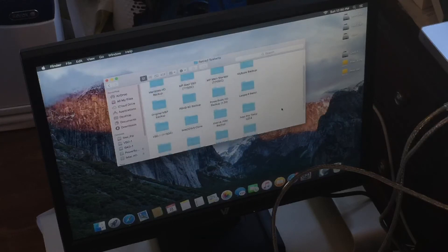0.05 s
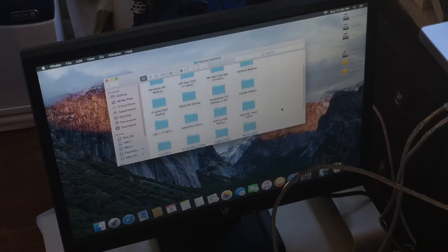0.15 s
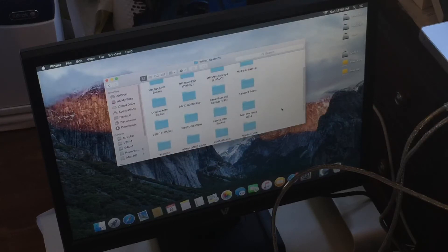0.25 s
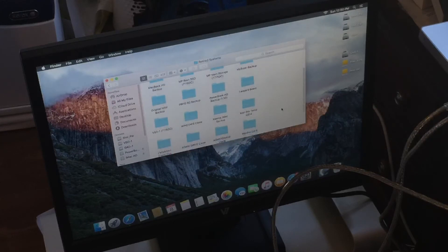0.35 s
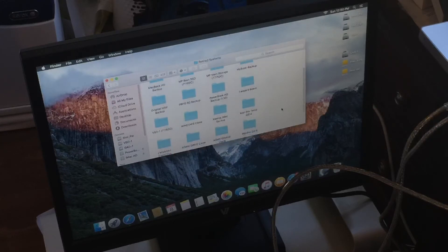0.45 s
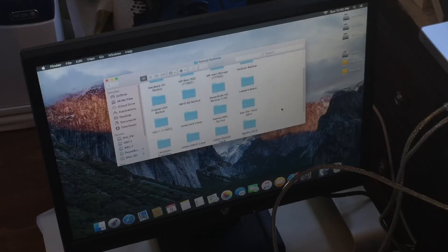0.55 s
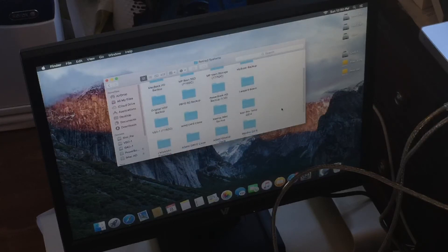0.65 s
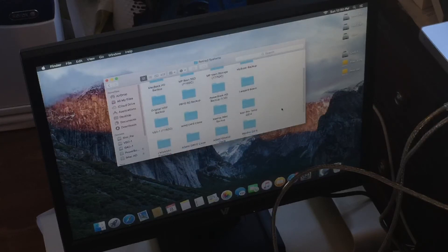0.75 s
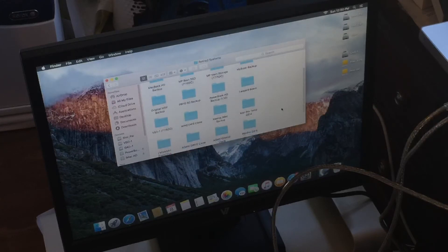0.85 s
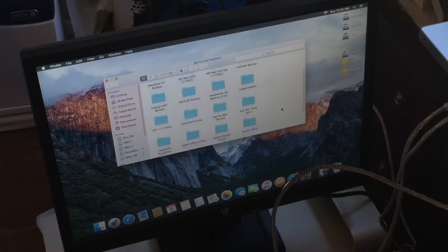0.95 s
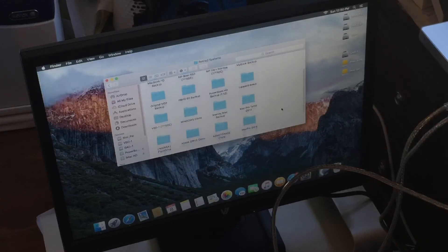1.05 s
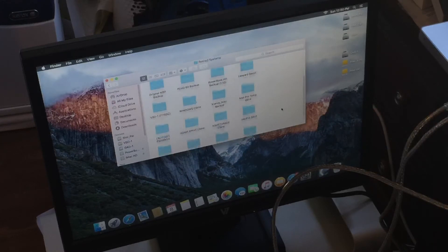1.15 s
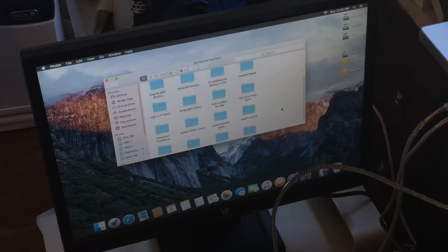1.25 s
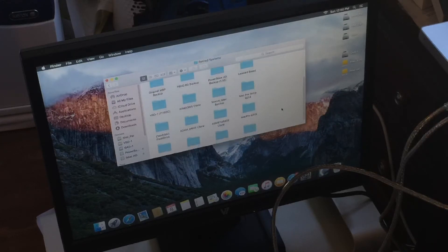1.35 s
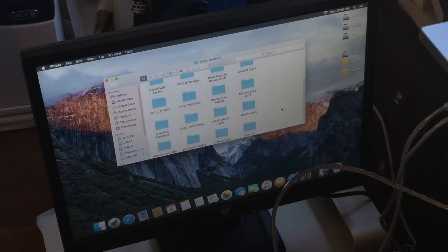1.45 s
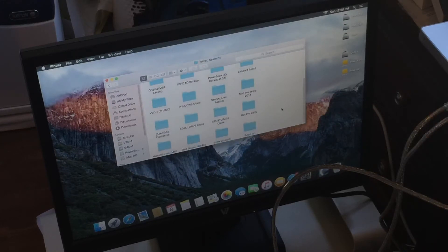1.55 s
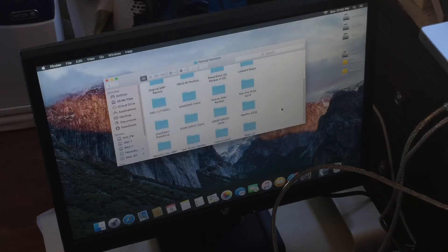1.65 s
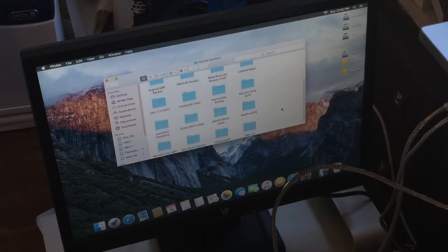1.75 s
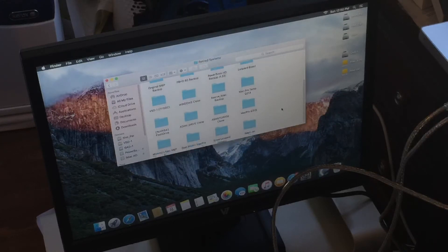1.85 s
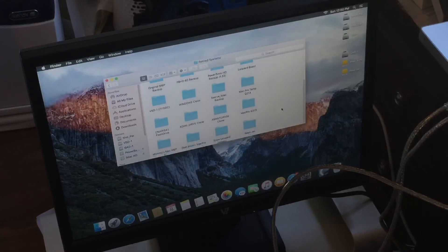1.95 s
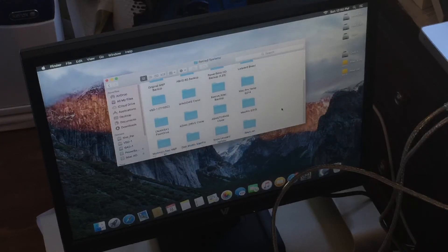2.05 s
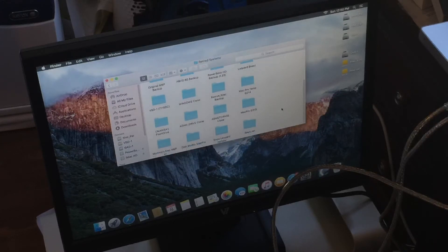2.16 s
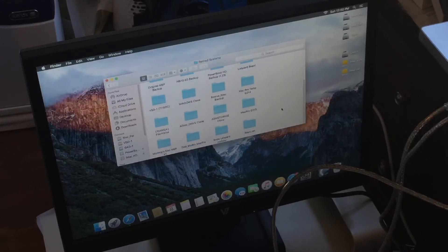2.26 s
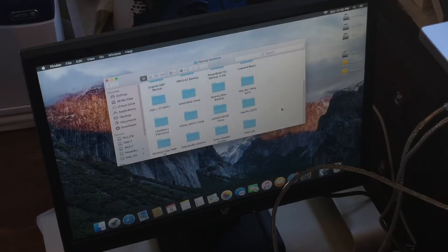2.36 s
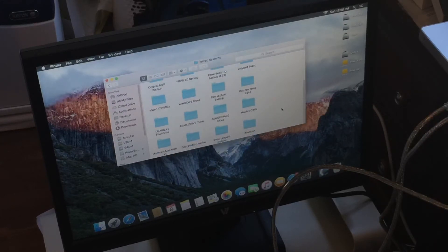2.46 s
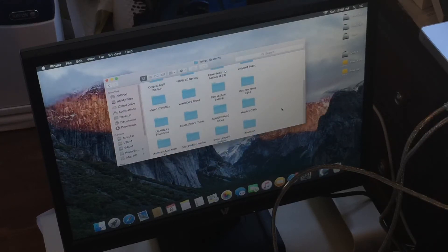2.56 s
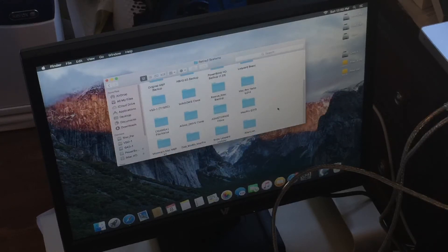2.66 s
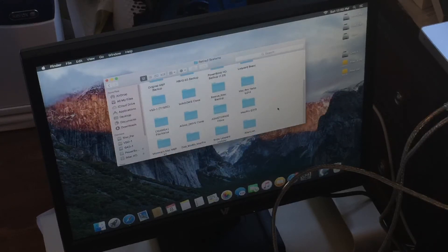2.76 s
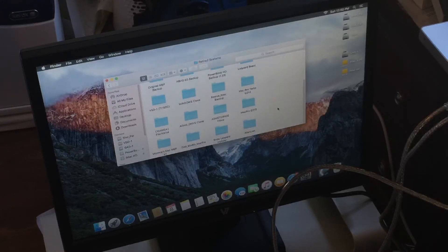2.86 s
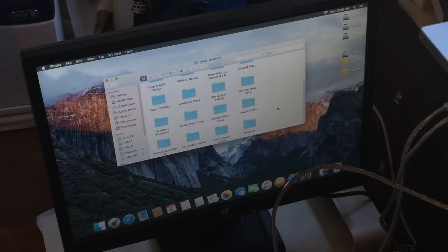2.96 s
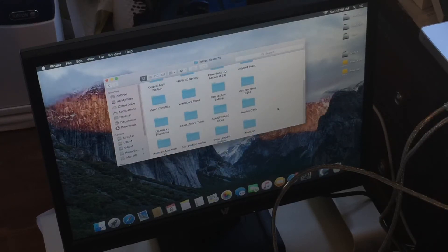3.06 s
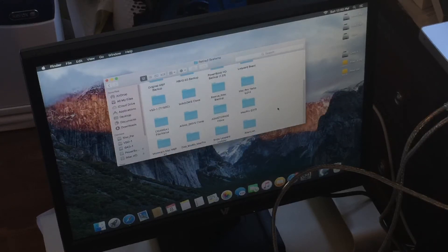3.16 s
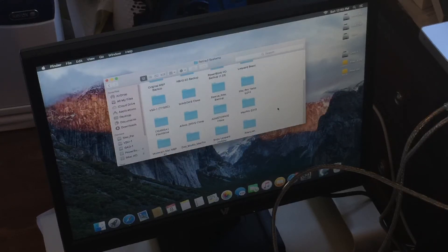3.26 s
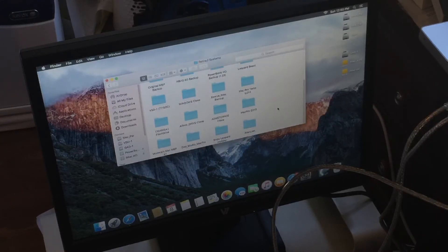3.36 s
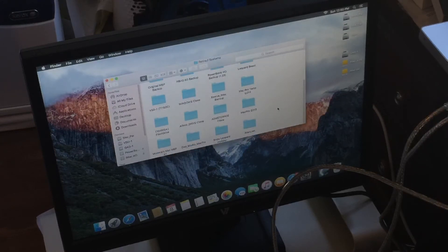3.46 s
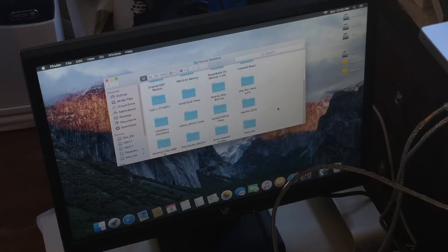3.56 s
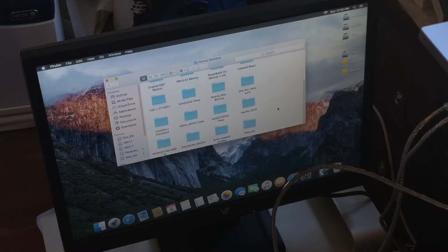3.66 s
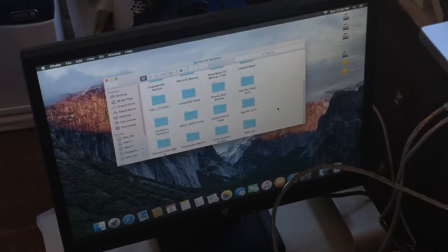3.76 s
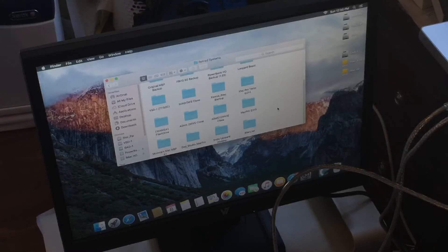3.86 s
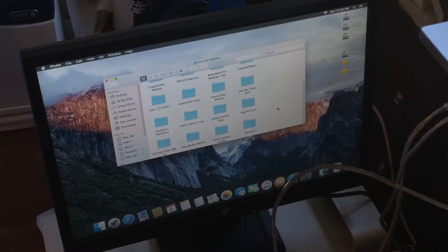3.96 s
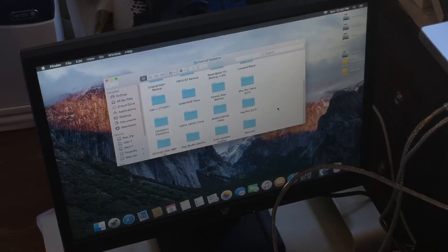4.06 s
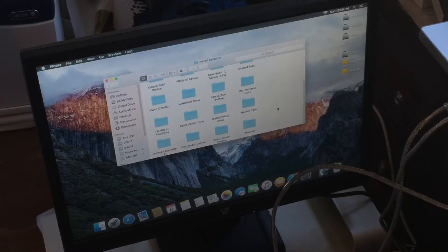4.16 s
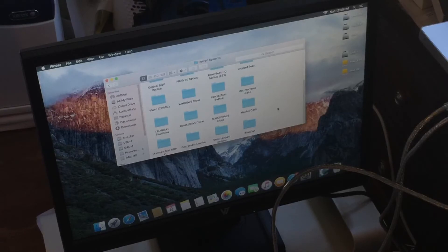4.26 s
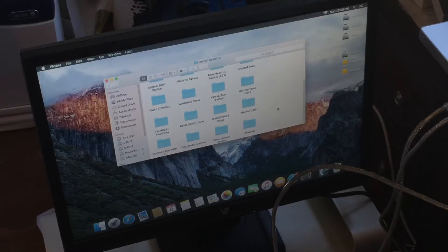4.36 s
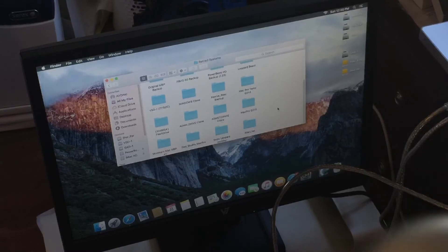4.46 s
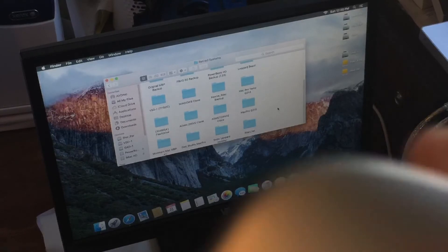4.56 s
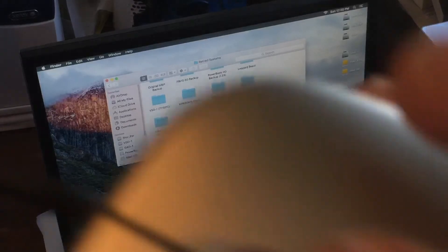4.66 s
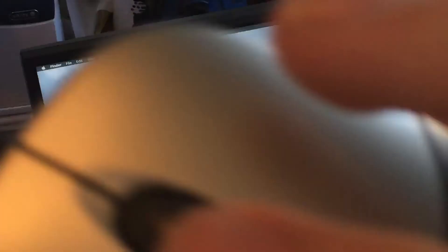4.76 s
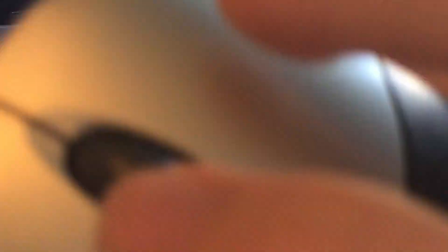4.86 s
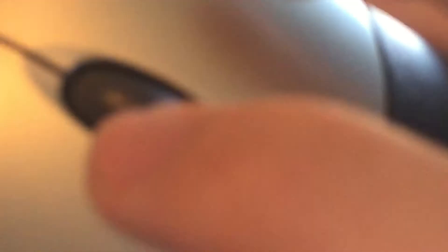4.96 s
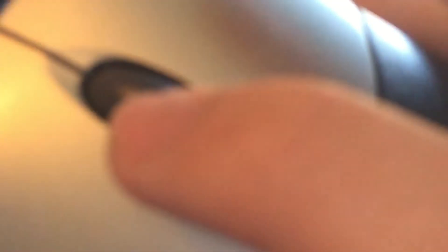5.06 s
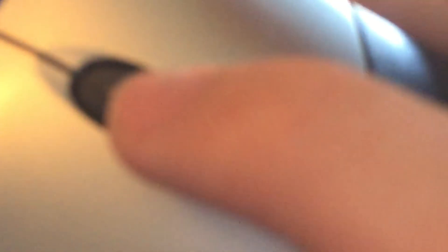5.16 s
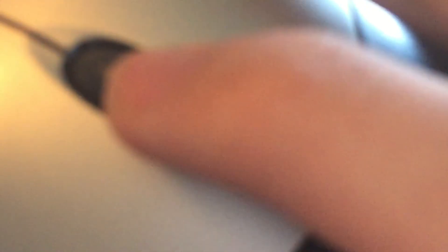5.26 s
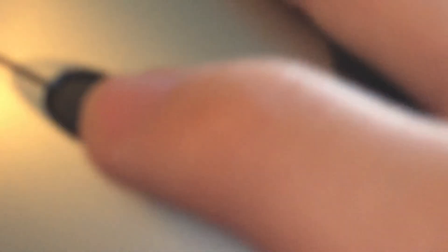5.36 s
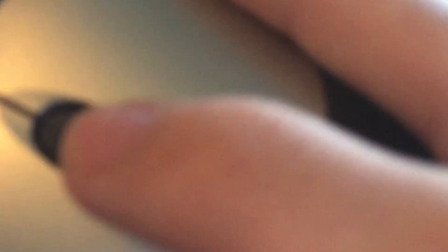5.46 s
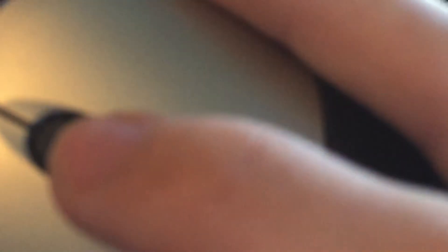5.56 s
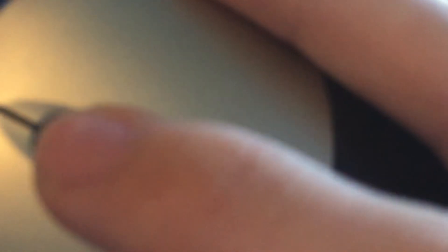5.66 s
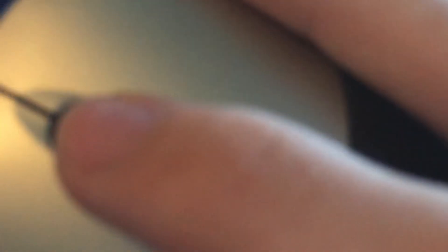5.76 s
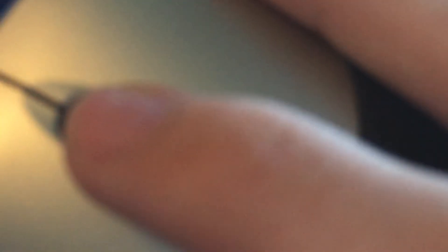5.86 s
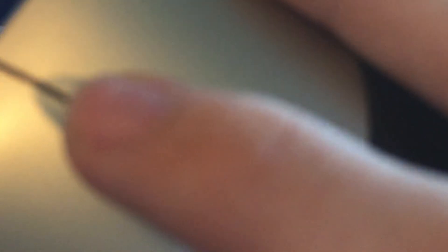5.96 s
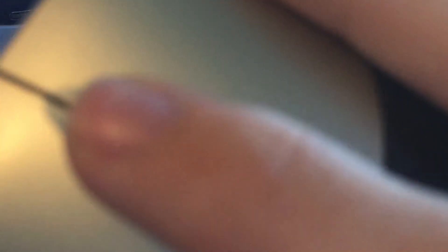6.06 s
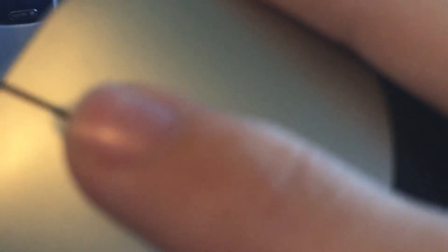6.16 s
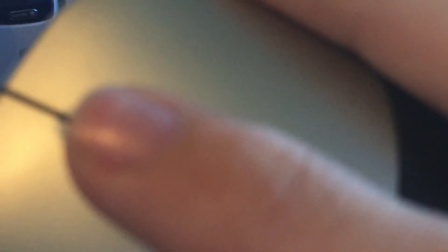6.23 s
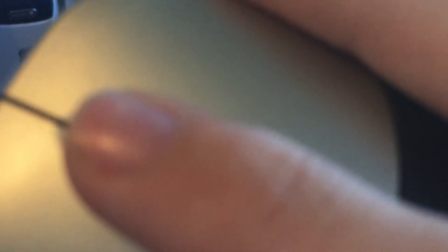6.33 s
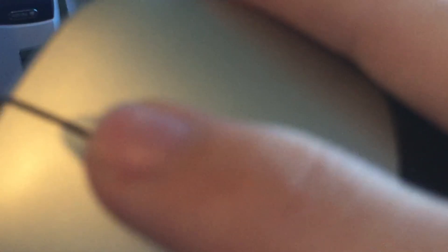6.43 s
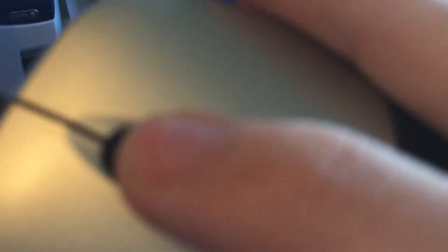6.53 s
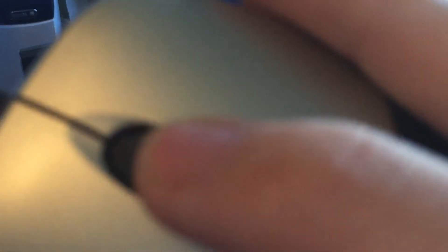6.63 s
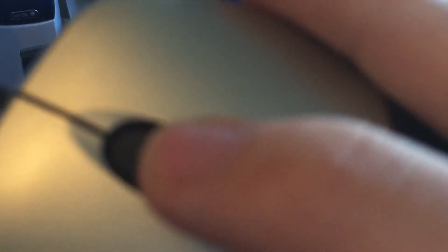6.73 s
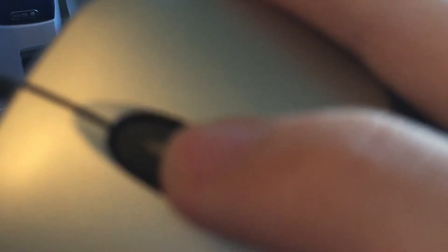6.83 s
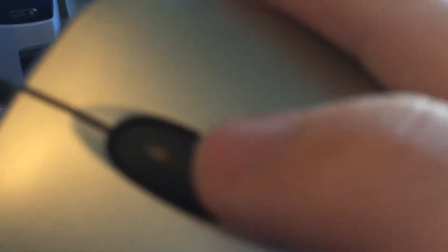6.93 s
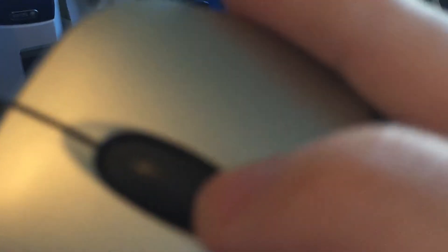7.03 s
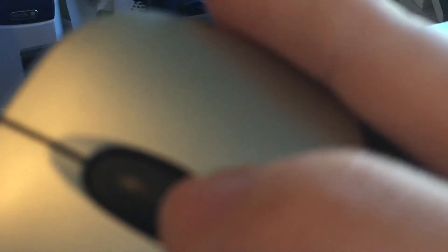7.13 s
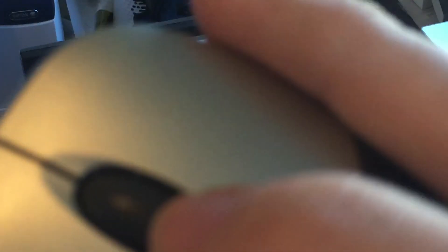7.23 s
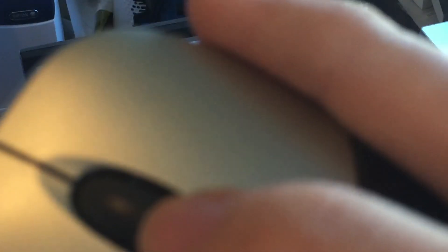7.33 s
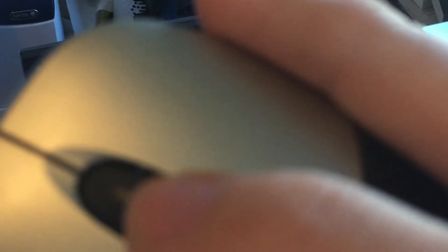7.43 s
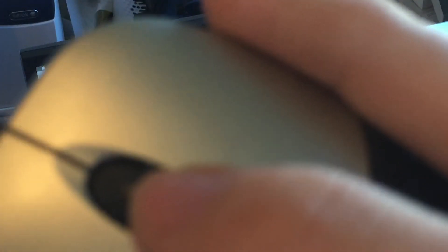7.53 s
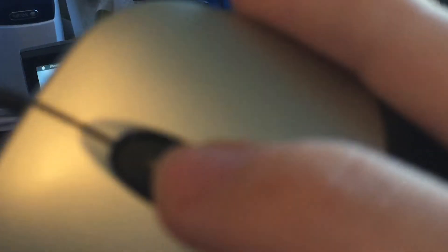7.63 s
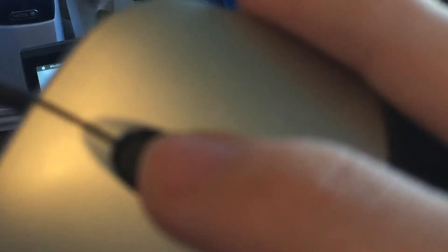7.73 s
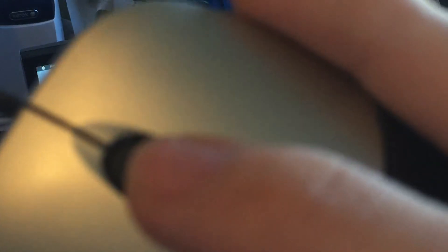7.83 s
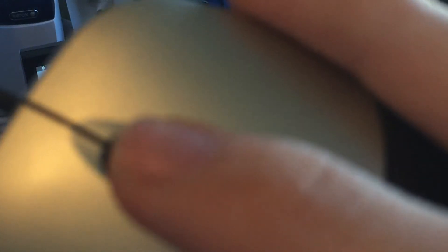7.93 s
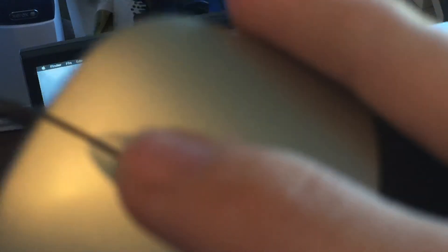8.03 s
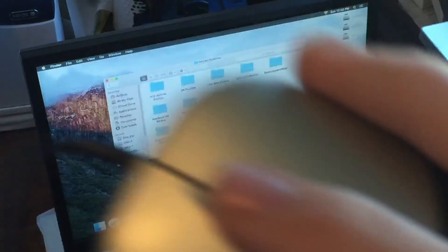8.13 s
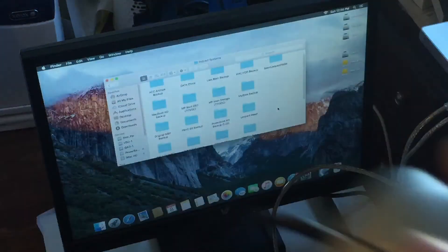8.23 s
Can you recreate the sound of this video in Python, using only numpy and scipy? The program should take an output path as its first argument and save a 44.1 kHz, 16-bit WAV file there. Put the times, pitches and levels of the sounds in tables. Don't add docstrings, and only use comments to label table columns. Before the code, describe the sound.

Small plastic ticks of a scroll wheel, first rolled forward, then back in a quick cluster, sound a little distant and coloured by the desk. Fingers tap and rustle, a dull thump shakes the microphone and a sleeve sweeps past. Held up close, the wheel snaps crisply and loudly with short squeaky creaks, over low room tone and hiss.

```python
import sys
import numpy as np
from scipy import signal
from scipy.fft import rfft, irfft, next_fast_len
from scipy.io import wavfile
from scipy.ndimage import uniform_filter1d, map_coordinates

SR = 44100
rng = np.random.default_rng(int(sys.argv[2]) if len(sys.argv) > 2 else 0)


def amplitude_ratio(level_db):
    exponent = np.asarray(level_db, float) / 20
    return 10 ** exponent


def dump_mix(stems):
    frames = np.atleast_2d(stems).T
    limited = np.clip(frames, -1, 1)
    pcm = np.round(limited * 32767).astype(np.int16)
    wavfile.write(sys.argv[1], SR, pcm)


N = 365588


def unit(x):
    return x / np.sqrt(np.mean(x ** 2) + 1e-20)


def along(points, hz):
    f, value = np.transpose(points)
    return np.interp(np.log(hz + 1), np.log(f + 1), value)


def coloured(x, gain):
    m = next_fast_len(N + 8192)
    shaped = rfft(x, m) * gain(np.fft.rfftfreq(m, 1 / SR))
    return unit(irfft(shaped, m)[:N])


def narrow(hz, width_hz):
    return coloured(rng.standard_normal(N), lambda f: 1 / (1 + (2 * (f - hz) / width_hz) ** 2))


def add(track, s, sound):
    part = track[round(s * SR):][:len(sound)]
    part += sound[:len(part)]


def small(x, hz):
    return signal.sosfilt(signal.butter(3, hz, "highpass", fs=SR, output="sos"), x)


def swells(s, rise_s, fall_s, db):
    power, t = np.zeros(N), np.arange(-SR // 2, SR) / SR
    for at, rise, fall, top_db in zip(*np.broadcast_arrays(s, rise_s, fall_s, db)):
        below_db = 25 * np.maximum(-t / abs(rise), t / abs(fall))
        add(power, at + t[0], amplitude_ratio(2 * (top_db - below_db)))
    return np.sqrt(power)


def room(send, colour, wet_db, gap_s):
    # f/Hz, t60/s
    wall_decay = [(500, 0.11), (2500, 0.26), (4400, 0.23), (9000, 0.19), (15000, 0.048)]
    hz, t, z = signal.stft(rng.standard_normal(SR // 2), SR, nperseg=128)
    fading = amplitude_ratio(-60 * t / along(wall_decay, hz)[:, None])
    tail = signal.istft(z * fading, SR, nperseg=128)[1]
    onset = np.clip((np.arange(len(tail)) / SR - gap_s) / 0.00052, .15, 1)
    tail = tail / np.linalg.norm(tail) * onset
    m = next_fast_len(N + SR)
    tint = amplitude_ratio(along(colour, np.fft.rfftfreq(m, 1 / SR)))
    wet = irfft(rfft(send, m) * rfft(tail, m) * tint, m)
    return amplitude_ratio(wet_db) * wet[:N]


def air():
    # f/Hz, level/dB per Hz
    room_tone = [(12, -53), (20, -25), (65, -3), (124, -7), (223, -8), (280, -9), (403, -12.5),
                 (667, -13.5), (988, -16.5), (2230, -19), (2430, -18), (2870, -19), (12700, -27.5),
                 (15000, -29), (16400, -68.5)]
    # f/Hz, width/Hz, rms level/dB
    fan_lines = [(113, 12, -84.5), (280.6, 6.7, -80.5), (201, 17, -86), (733, 14, -88.5)]
    hiss = amplitude_ratio(-63) * coloured(rng.standard_normal(N), lambda f: amplitude_ratio(along(room_tone, f)))
    mains_phase = 2 * np.pi * 119.6 * np.arange(N) / SR + .5 * narrow(0.46, 1.8)
    mains = amplitude_ratio(-70) * np.sin(mains_phase)
    fan = sum(amplitude_ratio(db) * narrow(hz, width) for hz, width, db in fan_lines)
    return hiss + mains + fan


def squeaks():
    # start t/s, length/s, peak rms level/dB, start f/Hz
    loadings = [(0.138, 0.022, -64, 1036), (0.297, 0.022, -57, 976), (1.039, 0.028, -60, 1027),
                (1.265, 0.016, -62, 970), (1.392, 0.025, -57, 983), (1.826, 0.031, -58.5, 940),
                (1.978, 0.034, -55.5, 960), (5.675, 0.036, -46, 840), (6.019, .016, -39.5, 892),
                (6.823, 0.028, -43, 1070), (7.719, 0.021, -54, 960), (7.92, .027, -41.5, 960),
                (8.153, .018, -42.5, 980)]
    # start t/s, length/s, peak rms level/dB, f/Hz
    creeps = [
        (0.899, .01, -63.5, 1063),
        (5.643, 0.035, -63, 851),
        (6.156, 0.012, -55, 945),
        (6.803, 0.038, -58, 1005),
        (6.857, .024, -59, 1092),
        (7.165, 0.025, -69, 745),
        (7.554, 0.011, -51, 867),
        (7.567, 0.0033, -47, 850),
        (7.577, 0.0048, -52, 884),
        (7.91, 0.027, -49.5, 943),
    ]
    overtones_db = [3.5, -10, -3.5, -4.5]
    release_hz = 1128
    creep_rise = 1.02
    slips = [(*row, release_hz, -7.5) for row in loadings]
    slips += [(*row, row[-1] * creep_rise, -5) for row in creeps]
    out = np.zeros(N)
    for start, length, db, low_hz, high_hz, rasp_db in sorted(slips):
        over_db = rasp_db - 400 * length
        u = np.linspace(0, 1, max(round(length * SR), 9))
        turn = 2 * np.pi * np.cumsum(low_hz + (high_hz - low_hz) * u) / SR
        shake = np.cumsum(rng.normal(0, 0.076, len(u)))
        flutter = rng.standard_normal((len(overtones_db), len(u)))
        lumps = amplitude_ratio(60 * uniform_filter1d(flutter, size=130, axis=1))
        over = 0
        for k, overtone_db in enumerate(overtones_db):
            over = over + amplitude_ratio(over_db + overtone_db) * lumps[k] * np.sin((k + 2) * (turn + shake))
        swell = np.abs(np.sin(np.pi * u ** 1.3)) ** .55
        add(out, start, amplitude_ratio(db + 3.5) * swell * (np.sin(turn) + over))
    return out


def notches(events, shell, echo, blur, crack_db, crack_t60, bounce_s, bounce_db, wet_db, gap_s):
    out, send, t = np.zeros(N), np.zeros(N), np.arange(SR // 10) / SR
    hz, level_db, t60 = np.transpose(shell)[:, :, None]
    band = signal.butter(2, [1700, 6500], "bandpass", fs=SR)
    landing_s = .0017
    after = t - landing_s
    swell = np.sin(np.pi / 2 * np.clip(t / landing_s, 0, 1)) ** 2
    for s, db, bright_db in events:
        tone_db = level_db + rng.normal(0, 1.8, hz.shape) + bright_db * np.log2(hz / 3500)
        phase = 2 * np.pi * hz * after + blur * rng.standard_normal(hz.shape)
        modes = amplitude_ratio(tone_db - 60 * np.abs(after) / t60) * np.sin(phase)
        click = swell * np.sum(modes, axis=0)
        add(click, bounce_s, amplitude_ratio(bounce_db + rng.normal(0, 1.0)) * click.copy())
        burst = rng.standard_normal(len(t)) * swell
        crack = amplitude_ratio(crack_db - 60 * t / crack_t60) * signal.lfilter(*band, burst)
        add(out, s + .0003, amplitude_ratio(db) * (click / np.abs(click).max() + crack))
        spit = .15 * burst * amplitude_ratio(-60 * t / .01) + (t == 0)
        add(send, s, amplitude_ratio(db) * spit / np.linalg.norm(spit))
    return small(out, 490) + room(send, echo, wet_db, gap_s)


def forward_on_desk():
    # t/s, peak level/dB, brightness/dB
    forward_rolls = [(0.167, -32, -0.5), (0.3199, -31.5, 1.5), (0.9185, -34, 0.5), (1.0665, -31.5, -1.5),
                     (1.12, -33.5, -2.5), (1.2879, -31.5, -2.5), (1.417, -32.5, -2), (1.8562, -36, -1),
                     (2.0093, -34, 1), (2.1612, -32, 0.5), (2.2874, -32, 4)]
    # f/Hz, level/dB, t60/s
    shell = [(1800, -5, 0.0059), (2532, 3, 0.03), (3233, -1.5, 0.032), (3700, 0.5, 0.013),
             (4350, -17, 0.035), (4373, 0.5, 0.014), (5040, -8.5, 0.012), (5625, -6, 0.05),
             (6580, -10, 0.017), (7200, -14, .012), (8840, -13, 0.012), (13330, -11, 0.0037)]
    # f/Hz, level/dB per Hz
    echo = [(760, -47), (1300, -17), (1900, -8), (2830, -8), (3130, -6), (3930, -6), (4300, 1.5),
            (4970, -12), (5450, -8), (6820, -11), (7560, -27), (8900, -27), (15000, -25)]
    return notches(forward_rolls, shell, echo, blur=1.5, crack_db=-5, crack_t60=.02,
                   bounce_s=.0038, bounce_db=-5, wet_db=22.5, gap_s=.0105)


def back_on_desk():
    # t/s, peak level/dB, brightness/dB
    back_rolls = [
        (2.4114, -35.5, 6.5),
        (2.9302, -32.5, 1),
        (2.9517, -32, 6.5),
        (3.0209, -32, 2),
        (3.0774, -29.5, -3.5),
        (3.1535, -30, -2.5),
    ]
    # f/Hz, level/dB, t60/s
    shell = [(2050, 0.5, 0.014), (2550, -3, 0.022), (3400, -3, 0.022), (3800, -10, 0.016),
             (4360, 5.5, 0.01), (4660, 0, 0.016), (5440, -18, 0.0076), (7100, -10, 0.0066),
             (8900, -7.5, 0.0039), (11500, -36, .008), (14000, -25, 0.007)]
    # f/Hz, level/dB per Hz
    echo = [(590, -19), (1000, -7.5), (1170, -10), (2140, -4), (3360, -4), (3760, -5.5), (4410, 1),
            (4940, -7.5), (6490, -9.5), (7690, -18), (8910, -14), (10300, -31), (15000, -9)]
    return notches(back_rolls, shell, echo, blur=1.5, crack_db=-3, crack_t60=.02,
                   bounce_s=.0065, bounce_db=-7, wet_db=21.5, gap_s=0.004)


def close_in_hand():
    # t/s, peak level/dB, brightness/dB
    close_rolls = [
        (5.7098, -9, -0.5),
        (6.0392, -10, 0),
        (6.1773, -10, 3),
        (6.561, -14.5, 0),
        (6.6939, -10, 1),
        (6.8373, -8.5, 1.5),
        (7.4959, -9.5, 0.5),
        (7.7377, -10, 0),
        (7.9445, -9, 1.5),
        (8.1714, -11.5, 2.5),
    ]
    # f/Hz, level/dB, t60/s
    shell = [(960, -18.5, 0.015), (1550, -19, 0.023), (1980, -2.5, 0.022), (2360, -3.5, 0.016),
             (2560, 3.5, 0.018), (3222, -11, 0.048), (3650, -12, 0.018), (4080, 0, 0.018),
             (4260, -2, 0.015), (4540, -4, 0.014), (5340, -10, 0.012), (5630, -4, 0.012),
             (6420, -7.5, 0.012), (7300, -13, 0.0045), (8240, -10, 0.0038), (9500, -18, 0.0096),
             (11340, -25.5, 0.015), (13500, -14.5, 0.0068), (14650, -19, .008)]
    # f/Hz, level/dB per Hz
    echo = [(410, -57), (700, -4), (1060, -11.5), (1330, -12), (2190, -7), (2560, -1), (2910, -9),
            (3800, -11.5), (4270, 0), (4850, -8), (6600, -9.5), (10600, -29), (15000, -17)]
    return notches(close_rolls, shell, echo, blur=.7, crack_db=-15, crack_t60=.03,
                   bounce_s=.0013, bounce_db=-14, wet_db=4, gap_s=0.0034)


def taps():
    # t/s, peak level/dB, hollow f/Hz, wall f/Hz, brightness/dB
    touches = [(2.6211, -36, 837, 2255, -5), (3.6631, -29, 900, 2130, 5.5), (3.715, -30, 634, 1705, -25),
               (4.0253, -47, 1280, 2380, -12), (4.2123, -44.5, 1266, 1580, -23),
               (4.6503, -34, 920, 2460, -1), (4.6558, -28, 855, 2174, 5.5), (4.7701, -51, 820, 1670, -20),
               (5.2924, -35, 880, 2160, -13), (5.3737, -72, 790, 2120, -13), (6.9486, -41, 720, 2150, -21),
               (7.1861, -47, 765, 1980, -22), (7.7154, -45.5, 940, 2560, 1), (8.2102, -54, 980, 1980, 15)]
    out, t = np.zeros(N), np.arange(SR // 8) / SR
    bright = signal.butter(2, [2700, 5200], "bandpass", fs=SR)
    for s, db, hollow_hz, wall_hz, bright_db in touches:
        ratio = np.exp(np.linspace(-.15, .15, 9)[:, None] + rng.normal(0, .03, (9, 1)))
        wall = np.sum(np.sin(2 * np.pi * (ratio * wall_hz * t + rng.random(ratio.shape))), axis=0)
        wall = wall * amplitude_ratio(-60 * t / 0.025) * (1 - np.exp(-t / 0.00092))
        hollow_db = -41.5 + 0.39 * (db + 38) - db
        pair = np.sin(2 * np.pi * hollow_hz * t) + 0.28 * np.sin(2 * np.pi * 1.134 * hollow_hz * t)
        hollow = amplitude_ratio(hollow_db + 4.0 - 60 * t / 0.032) * pair * (1 - np.exp(-t / 0.0013))
        crack = signal.lfilter(*bright, rng.standard_normal(len(t)))
        crack = crack * amplitude_ratio(bright_db + 6.5 - 60 * t / 0.013) * (1 - np.exp(-t / 0.00061))
        add(out, s, amplitude_ratio(db) * (wall / np.abs(wall).max() + hollow + crack))
    return small(out, 550)


def strokes(rows, fizz_db):
    s, rise_s, fall_s, db, dull_db = np.transpose(rows)
    return np.array([swells(s, rise_s, fall_s, db + over_db) for over_db in (dull_db, 0, fizz_db)])


def slides():
    # peak t/s, rise/s, fall/s, bright level/dB, dull over bright/dB
    grips = [
        (3.656, .03, .004, -56, -7),
        (3.675, .004, .06, -74, 2),
        (3.717, 0.0076, 0.043, -42.5, -13),
        (3.74, .02, .16, -52.5, 0),
        (4.221, 0.03, 0.059, -66.5, 17.5),
        (8.187, .004, 0.055, -62, 7),
        (8.209, .009, 0.15, -48, -3),
        (8.25, 0.085, 0.2, -48.5, -7),
    ]
    # peak t/s, rise/s, fall/s, bright level/dB, dull over bright/dB
    brushes = [
        (3.881, 0.066, 0.35, -53, -3.5),
        (3.96, 0.11, .15, -55, -3),
        (4.027, 0.025, 0.13, -48.5, -0.5),
        (4.311, 0.011, 0.13, -41, -5.5),
        (4.335, 0.044, 0.11, -42, -7),
        (4.36, .08, 0.084, -39.5, -7.5),
        (4.385, .08, 0.11, -47.5, -7),
        (4.645, 0.042, .004, -58.5, 5.5),
        (4.667, .004, .03, -54, -2),
    ]
    # f/Hz, level/dB per Hz
    dull, bright, fizz = [(350, -52), (520, -11), (750, -2), (1300, -1), (1700, -5), (2200, -9.5),
                          (2900, -17), (4800, -120)], [(1060, -30), (1800, -6), (2410, -4), (3290, -2), (6180, -10.5),
                                        (7000, -33), (9100, -49), (15400, -120)], [(5500, -26), (6800, 11.5), (9000, 2.5), (11000, -5),
                                                        (15500, -7.5)]
    gains = np.hypot(strokes(grips, fizz_db=-8.5), strokes(brushes, fizz_db=-16))
    out = 0
    for gain, spectrum in zip(gains, (dull, bright, fizz)):
        clumps = map_coordinates(rng.standard_normal(1500), [np.linspace(0, 1499, N)])
        catches = np.minimum(rng.exponential(size=N), 4) * (rng.random(N) < .05)
        grains = rng.standard_normal(N) * amplitude_ratio(0.56 * clumps + 2.9 * catches)
        z = signal.stft(grains, nperseg=256)[2]
        patches = uniform_filter1d(rng.standard_normal(z.shape), size=3, axis=0)
        patches = uniform_filter1d(patches, size=4, axis=1)
        grains = signal.istft(z * amplitude_ratio(2.4 * unit(patches)), nperseg=256)[1][:N]
        out = out + gain * coloured(grains, lambda f: amplitude_ratio(along(spectrum, f)))
    return out


def snaps():
    # t/s, peak level/dB, centre f/Hz, spread/octaves, t60/s
    cracks = [
        (3.6629, -23.5, 4900, 0.55, 0.0067),
        (3.872, -49, 11000, .8, 0.0099),
        (4.355, -42, 9000, 1.4, .006),
        (4.655, -51, 3940, 0.5, 0.0033),
        (5.2935, -37, 3800, 0.21, 0.015),
        (8.2105, -30.5, 6000, 0.62, 0.0068),
        (8.234, -40, 557, 0.37, 0.19),
        (8.255, -43.5, 630, 0.26, 0.15),
    ]
    out, t = np.zeros(N), np.arange(SR // 12) / SR
    for s, db, centre_hz, spread, t60 in cracks:
        edges = np.clip(centre_hz * 2 ** (spread * np.array([-.5, .5])), 200, 17000)
        band = signal.butter(1, edges, "bandpass", fs=SR)
        crack = signal.lfilter(*band, rng.standard_normal(len(t)))
        crack = crack * amplitude_ratio(-60 * t / t60) * (1 - np.exp(-t / 0.00015))
        add(out, s, amplitude_ratio(db) * crack / np.abs(crack).max())
    return out


def jolts(rows, rise_s, fall_s):
    s, db = np.transpose(rows)
    return swells(s, rise_s, fall_s, db)


def bumps():
    # peak t/s, level/dB
    sway_jolts = [
        (3.76, -48),
        (3.79, -46.5),
        (3.87, -52),
        (3.91, -51),
        (4.12, -64),
        (4.425, -61),
        (8.29, -62),
    ]
    ring_jolts = [
        (3.73, -44),
        (3.754, -37.5),
        (3.826, -42.5),
        (3.906, -57),
        (4.4, -65),
        (8.29, -63),
    ]
    knock_jolts = [
        (3.722, -49.5),
        (3.786, -52.5),
        (3.906, -51.5),
        (4.04, -48),
        (4.08, -59),
        (4.4, -48.5),
        (8.24, -50.5),
        (8.29, -53.5),
    ]
    sway = jolts(sway_jolts, rise_s=0.064, fall_s=0.11)
    ring = jolts(ring_jolts, rise_s=0.035, fall_s=0.063)
    knock = jolts(knock_jolts, rise_s=0.04, fall_s=0.087)
    t = np.arange(N) / SR
    swaying = sway * np.sin(2 * np.pi * 54 * t)
    ringing = ring * np.sin(2 * np.pi * 96 * t + 0.25 * narrow(5.6, 24))
    return np.sqrt(2) * (swaying + ringing) + knock * narrow(210, 210)


def scene():
    # f/Hz, level/dB
    soft_echo = [(500, 1), (1100, 5), (2600, -6), (6000, -8), (15000, 2)]
    soft = squeaks() + taps() + snaps()
    lifted = np.arange(N) / SR > 4.5
    send = soft * np.where(lifted, amplitude_ratio(-11), amplitude_ratio(0.5))
    soft = soft + room(send, soft_echo, wet_db=-3, gap_s=0.0013)
    wheel = forward_on_desk() + back_on_desk() + close_in_hand()
    return (wheel + soft + slides() + bumps() + air())[None]


def roll_off(x):
    return signal.sosfilt(signal.butter(12, 16500, fs=SR, output="sos"), x)


def record(dry):
    # f/Hz, width/Hz, level/dB
    port = [(7450, 390, -2.5), (10630, 650, -3.5)]
    m = next_fast_len(N + SR // 4)
    f = np.fft.rfftfreq(m, 1 / SR)
    dips_db = sum(db / (1 + (2 * (f - hz) / width) ** 2) for hz, width, db in port)
    top_db = -20 * np.clip((f - 15100) / 800, 0, 3)
    heard = irfft(rfft(dry, m) * amplitude_ratio(dips_db + top_db), m)[:, :N]
    return roll_off(heard)


dry = scene()
out = record(dry)
dump_mix(out)
```